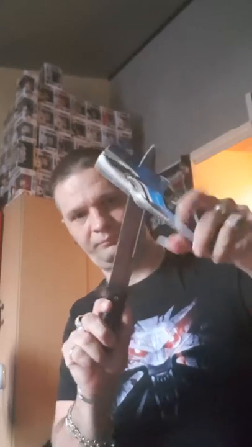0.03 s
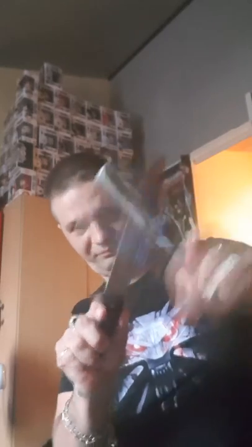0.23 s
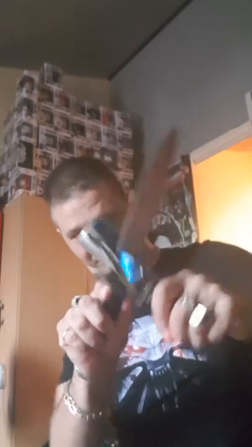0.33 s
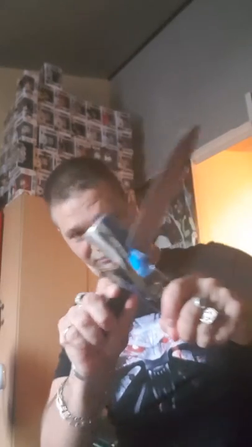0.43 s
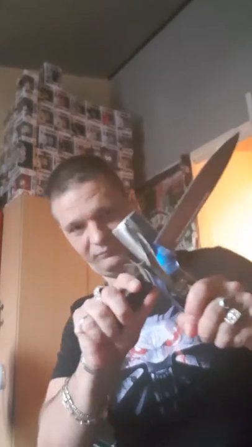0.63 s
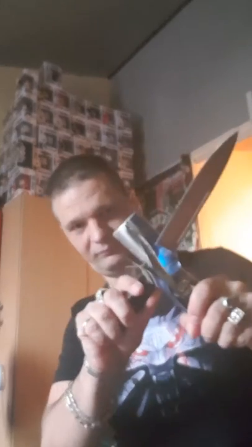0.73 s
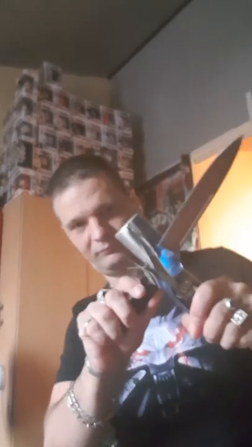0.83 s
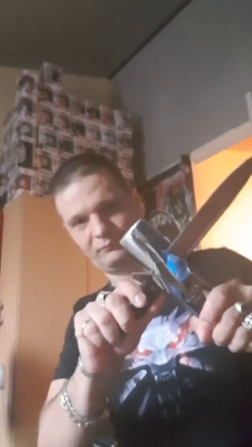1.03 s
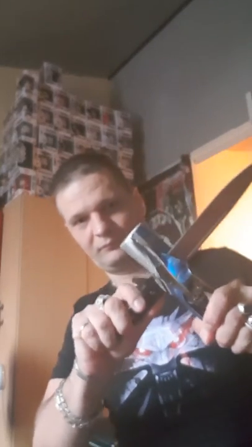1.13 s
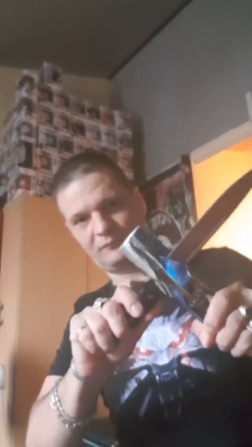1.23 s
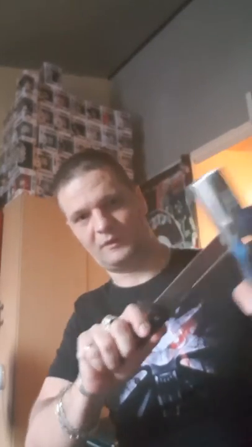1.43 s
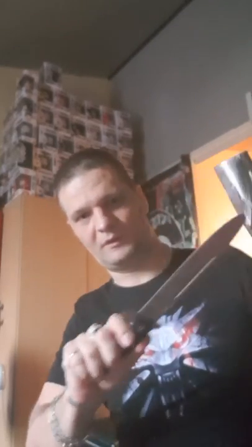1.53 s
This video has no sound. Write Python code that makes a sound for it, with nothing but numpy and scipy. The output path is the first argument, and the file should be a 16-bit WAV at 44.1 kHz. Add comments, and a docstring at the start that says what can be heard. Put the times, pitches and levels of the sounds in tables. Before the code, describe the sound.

A large knife punctures an empty spray can with a loud, short metallic crunch. The can ticks faintly on the blade, then is pulled off with a squeaky scrape and a light slide, close by in a small quiet room.

```python
"""The thin wall of an empty spray can dents, then tears in a loud crackling run as a large knife is
driven through it. The can ticks and rubs on the blade, then is dragged off with a squealing scrape and
a last light slide. Impacts and stick-slip friction excite the wall and the normal modes of can and
blade. The hands add dull thuds that sound the air in the can; the small, quiet room answers briefly."""
import sys
import numpy as np
from scipy import signal
from scipy.fft import rfft, irfft
from scipy.io import wavfile

SR = 44100
rng = np.random.default_rng(int(sys.argv[2]) if len(sys.argv) > 2 else 0)


def bounce(signal):
    """Save signal as a 16-bit WAV file at the path given by the first command-line argument."""
    frames = np.transpose(np.atleast_2d(signal))
    limited = np.clip(frames, -1, 1)
    pcm = np.round(limited * 32767).astype(np.int16)
    wavfile.write(sys.argv[1], SR, pcm)


N = 70560
TIME = np.arange(N) / SR
FFT_SIZE = 2 ** 17
HZ = np.maximum(np.fft.rfftfreq(FFT_SIZE, 1 / SR), 1)

# Sharp contacts of blade and wall; the last four columns are relative to the level:
# (time [s], level [dB], bass [dB], treble [dB], can drive [dB], blade drive [dB])
SNAPS = [(0.0462, -56, -18, -17, 25, -19), (0.0568, -31, -42, 4, -23, -34),
         (.157, -33.5, -14.5, 1.5, 1, -5), (0.1669, -27, 13.5, -22.5, 10, -16),
         (0.1932, -22.5, 4, -17, 6, -23), (0.2206, -19, 0, -13, 15.5, -13.5), (0.2404, -14, 7, 3, -14, 1.5),
         (0.2513, -17, 4, 4, -10, -12), (.2642, -20.5, 2, -5.5, -5.5, -8), (0.273, -19, -10.5, -7, 1, -1.5),
         (0.2817, -10.5, -8, -2.5, 0, -14), (0.2984, -15, -6, -11, 3, -8.5),
         (0.475, -66.5, 0, -11.5, 11.5, 10.5), (1.1085, -36, -18.5, -9.5, -10.5, -30.5),
         (1.1185, -45, -10, -5.5, -10.5, -30), (1.2525, -50, -4.5, -6, 14.5, -12),
         (1.2646, -36.5, -10, 1, 10.5, -20), (1.293, -16.5, -15, -4, -36, -18),
         (1.438, -37, -2.5, -24, -4, -8)]
def snaps():
    """Impulsive excitation: each snap drives the wall, the can's modes and the blade's modes."""
    drive = np.zeros((3, N))
    for start_s, db, bass_db, treble_db, can_db, blade_db in SNAPS:
        force = shelve(contact(start_s), bass_db, treble_db)
        drive += np.outer(from_db([db, db + can_db, db + blade_db]), force)
    return drive

def contact(start_s, spread_s=0.0008, band_hz=132.5):
    """Dispersion: the thin sheet smears a click, as each band arrives with its own small delay."""
    hz = np.fft.rfftfreq(2048, 1 / SR)
    arrivals = rng.gamma(2, size=256)
    group_delay = spread_s * np.interp(hz / band_hz, np.arange(len(arrivals)), arrivals)
    click = irfft(np.exp(-2j * np.pi * np.cumsum(group_delay) * hz[1]))[:len(hz)]
    return np.pad(click * np.sqrt(SR * 0.002), (int(start_s * SR), 0))  # energy of 2 ms at rms 1

# Strokes of the edge along the wall; the last five columns are relative to the level: (time [s],
# duration [s], level [dB], swell [dB], bass [dB], treble [dB], can drive [dB], blade drive [dB])
SCRAPES = [(0, 0.042, -62.5, 3, 12, -8, -8, -12), (0.111, 0.056, -68.5, 13.5, -18, -3, 10.5, -2),
           (0.152, 0.018, -42.5, 9, -9, 2, 11.5, -24), (0.198, 0.018, -34, 6.5, 3, -2, 2, -15),
           (0.222, 0.014, -25, 1.5, -0.5, -1, 10.5, -3.5), (0.245, 0.049, -19, 5, -1.5, 0, -11.5, -28.5),
           (0.424, 0.04, -68.5, 3.5, 7.5, 6.5, -19, -5.5), (0.545, 0.09, -73.5, 1, -1, -16, 13, -2),
           (0.982, 0.05, -61, -8, -2, -14.5, 1.5, -15.5), (1.078, 0.04, -69, 22.5, 1, -5.5, 4, -39.5),
           (1.149, 0.065, -67, 0, 4, -5, 14.5, -33.5), (1.261, 0.081, -28.5, -2.5, -5.5, -4, -13, -17),
           (1.349, 0.081, -46.5, -5.5, 0.5, -7.5, 8, -31), (1.438, 0.08, -45, 3, -6, -1.5, -11, -26)]
def scrapes(slips_per_s=3500, spread_db=3, friction_db=-1.5, attack_share=0.052, release_s=0.005):
    """Stick-slip friction: dense uneven slips over smooth rubbing, chattering as the edge catches."""
    sizes = from_db(spread_db * np.minimum(rng.exponential(1, N), 4)) * rng.choice([-1, 1], N)
    slips = unit_rms(sizes * (rng.random(N) < slips_per_s / SR))
    rubbing = from_db(friction_db) * rng.standard_normal(N)
    chatter = from_db(2 * wander(per_s=270))
    friction = unit_rms((slips + rubbing) * chatter)
    drive = np.zeros((3, N))
    for start_s, length_s, db, swell_db, bass_db, treble_db, can_db, blade_db in SCRAPES:
        age = TIME - start_s
        attack = np.clip(age / (attack_share * length_s), 0, 1)
        release = np.exp(-np.maximum(age - length_s, 0) / release_s)
        growth = from_db(swell_db * np.clip(age / length_s, 0, 1))
        force = shelve(friction * attack * release * growth, bass_db, treble_db)
        drive += np.outer(from_db([db, db + can_db, db + blade_db]), force)
    return drive

# Crackle spectrum of the thin wall: (frequency [Hz], gain [dB])
WALL_RESPONSE = [(40, -25), (150, -15), (270, -20.5), (450, -5.5), (850, -5.5), (1100, 2), (1350, -1),
                 (2000, 1), (2700, 2), (4000, 5), (5900, 7), (7300, 4), (10000, -2), (15500, -11.5)]
def wall_crackle(force):
    """Forced response: the thin wall radiates the contact force over a broad band."""
    return colour(force, at_hz(WALL_RESPONSE, HZ))

# Normal modes of the can and of the blade: (frequency [Hz], peak gain [dB], bandwidth [Hz])
CAN_MODES = [(1055, 14.5, 36), (1150, 4, 170), (1583, -1.5, 72), (1690, -1.5, 81), (2150, -0.5, 38),
             (2530, -9, 200), (3460, -7, 360), (4170, -5, 130), (5450, 1.5, 150)]
BLADE_MODES = [(656, 5.7, 80), (1990, 19.1, 140), (3130, 9.5, 120), (4540, 4.7, 200), (5680, 9, 240)]
def metal_ring(can_force, blade_force):
    """Modal superposition: damped resonances add, each driven more or less as the contact moves."""
    ring = 0
    for force, modes in ((can_force, CAN_MODES), (blade_force, BLADE_MODES)):
        for hz, db, width_hz in modes:
            radius = np.exp(-np.pi * width_hz / SR)
            feedforward = np.array([1, 0, -1]) * (1 - radius ** 2) / 2
            feedback = [1, -2 * radius * np.cos(2 * np.pi * hz / SR), radius ** 2]
            drive = force * from_db(db + 0.5 * wander(per_s=54)) + 1e-18
            ring = ring + signal.lfilter(feedforward, feedback, drive)
    return ring

# Squeals of the wall on the steel: (centre time [s], duration [s], frequency [Hz], level [dB])
SQUEALS = [(.2545, 0.012, 5413, -18), (0.618, 0.034, 1036, -67), (1.105, .03, 1560, -60),
           (1.115, 0.02, 6250, -44.5), (1.194, 0.016, 1550, -58), (1.273, 0.019, 2650, -35),
           (1.283, 0.0067, 2020, -29.5), (1.296, 0.007, 6110, -18.5), (1.298, 0.0089, 2800, -30.5),
           (1.305, 0.0033, 1863, -30), (1.337, 0.017, 3380, -29.5), (1.332, 0.032, 1934, -35.5),
           (1.485, 0.012, 2450, -44), (1.487, 0.017, 5950, -41), (1.505, 0.04, 5100, -53)]
def squeals(sag_share=0.025, waver_share=0.05, flutter_db=4):
    """Stick-slip oscillation: short rasping tones waver, and sag in pitch as the grip lets go."""
    sound = 0
    for centre_s, length_s, hz, db in SQUEALS:
        sag = sag_share * np.clip((TIME - centre_s) / length_s, -1, 1)
        pitch = hz * (1 - sag + waver_share * wander(per_s=1200))
        gain = from_db(db + flutter_db * wander(per_s=360))
        sound = sound + gain * bump(centre_s, length_s) * tone(pitch)
    return sound

# Light knocks of the loose can on the blade:
# (time [s], blade drive [dB], wall and can drive [dB], favoured frequency [Hz])
TAPS = [(0.8538, -48, -61.5, 3700), (0.8836, -49.5, -55, 2290), (.9005, -53.5, -59, 5690),
        (0.9604, -55.5, -63, 2400), (.974, -47.5, -57, 6030), (1.0223, -60.5, -59.5, 2360)]
def taps(favour_db=4, favour_octaves=0.52):
    """Selective excitation: the point where a soft knock lands decides which modes stand out."""
    drive = np.zeros((3, N))
    for start_s, blade_db, wall_db, favoured_hz in TAPS:
        emphasis_db = favour_db * np.exp(-(np.log2(HZ / favoured_hz) / favour_octaves) ** 2)
        knock = shelve(contact(start_s), bass_db=0, treble_db=-7)
        drive += np.outer(from_db([wall_db, wall_db, blade_db]), colour(knock, emphasis_db))
    return drive

# Pushes of the hands: (centre time [s], duration [s], thud level [dB], cavity level [dB])
PUSHES = [(0.035, 0.27, -63.5, -82), (0.257, 0.099, -48, -35.5), (0.429, 0.03, -61, -56.5),
          (1.298, 0.082, -67.5, -59)]
# Spectrum of the dull thud: (frequency [Hz], relative level [dB])
THUD_SPECTRUM = [(20, -5), (40, 3.5), (90, 3), (150, 1.5), (260, -10.5), (600, -48), (3000, -81.5)]
def hand_pushes(cavity_hz=392.5, waver_share=0.047):
    """Cavity resonance: each push makes a dull thud and sounds the air inside the can."""
    thud_gain, cavity_gain = sum(np.outer(from_db([thud_db, cavity_db]), bump(centre_s, length_s))
                                 for centre_s, length_s, thud_db, cavity_db in PUSHES)
    cavity = tone(cavity_hz * (1 + waver_share * wander(per_s=120)))
    return cavity_gain * cavity + thud_gain * stereo_noise(THUD_SPECTRUM, side_db=-16.5)

def room(sound, split_hz=700, tail_db=-5, right_lag_s=0.00004):
    """Convolution: each side has its own near path and tail, alike in the bass; the right one lags."""
    shared_bass = butter(room_tail(), split_hz, "low")
    sides = []
    for lag_s in (0, right_lag_s):
        tail = shared_bass + butter(room_tail(), split_hz, "high")
        path = rfft(near_path(split_hz), FFT_SIZE) + from_db(tail_db) * rfft(tail, FFT_SIZE)
        delay = np.exp(-2j * np.pi * HZ * lag_s)
        sides.append(irfft(rfft(sound, FFT_SIZE) * path * delay)[:N])
    return np.array(sides)

def near_path(split_hz, scatter_db=2.5, decay_s=0.002):
    """Early reflections: direct sound plus a brief scatter off nearby surfaces, even in spectrum."""
    t = TIME[:SR // 10]
    scatter = butter(rng.standard_normal(len(t)) * np.exp(-t / decay_s), split_hz, "high")
    spectrum = 1 + from_db(scatter_db) * rfft(scatter / np.linalg.norm(scatter))
    for _ in range(6):  # flatten the magnitude while keeping the response short
        path = irfft(spectrum / np.abs(spectrum), len(t))[:len(t) // 2]
        spectrum = rfft(path, len(t))
    return path

# Decay of the small room: (frequency [Hz], reverberation time [s])
ROOM_T60 = [(150, 0.4), (400, 0.22), (1000, 0.2), (2500, 0.21), (6000, 0.16), (14000, 0.19)]
def room_tail(gap_s=0.0018, build_s=0.0055):
    """Reverberation: a diffuse field builds up, then decays exponentially, band by band."""
    t = TIME[:SR // 2]
    noise, hz = rfft(rng.standard_normal(len(t))), np.fft.rfftfreq(len(t), 1 / SR)
    centres, t60s = np.transpose(ROOM_T60)
    tail = 0
    for share, t60 in zip(np.eye(len(t60s)), t60s):
        band = irfft(noise * np.interp(hz, centres, share), len(t))
        tail = tail + band * from_db(-60 * t / t60)
    tail *= 1 - np.exp(-np.maximum(t - gap_s, 0) / build_s)
    return tail / np.linalg.norm(tail)

# Background of the still room: (frequency [Hz], relative level [dB])
AIR_SPECTRUM = [(20, -5.5), (60, -1.5), (135, -0.5), (320, -21.5), (750, -28), (2000, -30.5), (16000, -36)]
def still_air(level_db=-77.5):
    """Ambient noise: a faint steady rush, strongest in the bass."""
    return from_db(level_db) * stereo_noise(AIR_SPECTRUM, side_db=-7.0)

def stereo_noise(spectrum, side_db):
    """Partial coherence: coloured noise of rms 1 from a common part and a weaker opposed part."""
    mid, side = rng.standard_normal((2, N))
    return unit_rms(colour(mid + from_db(side_db) * np.array([side, -side]), at_hz(spectrum, HZ)))

def from_db(db):
    """Amplitude ratio of a level in decibels."""
    return 10 ** (np.asarray(db) / 20)

def unit_rms(x):
    """Normalisation to rms 1."""
    return x / np.sqrt(np.mean(x ** 2) + 1e-20)

def at_hz(points, hz):
    """Interpolation of a table on a log-frequency axis."""
    frequencies, values = np.transpose(points)
    return np.interp(np.log(hz), np.log(frequencies), values)

def colour(x, db):
    """Minimum-phase filtering with a gain in dB for each frequency of HZ."""
    cepstrum = irfft(np.log(from_db(db)))
    cepstrum[1:FFT_SIZE // 2] *= 2
    cepstrum[FFT_SIZE // 2 + 1:] = 0
    return irfft(rfft(x, FFT_SIZE) * np.exp(rfft(cepstrum)))[..., :N]

def shelve(x, bass_db, treble_db, bass_hz=540, treble_hz=7800):
    """Shelving: separate gains for the bass and the treble of a force."""
    low = 1 / (1 + (HZ / bass_hz) ** 4)
    high = 1 / (1 + (treble_hz / HZ) ** 7)
    return colour(x, bass_db * low + treble_db * high)

def butter(x, hz, kind):
    """Second-order low- or high-pass filtering."""
    return signal.sosfilt(signal.butter(2, hz, kind, fs=SR, output="sos"), x)

def wander(per_s):
    """Random modulation of rms 1, gliding to a new value per_s times a second."""
    return unit_rms(np.interp(TIME * per_s, np.arange(N), rng.standard_normal(N)))

def bump(centre_s, length_s):
    """Bell-shaped envelope around a moment."""
    return np.exp(-(2 * (TIME - centre_s) / length_s) ** 2)

def tone(hz):
    """Phase integration: a sine of rms 1 follows a pitch curve."""
    return np.sqrt(2) * np.sin(2 * np.pi * np.cumsum(hz) / SR)

def scene():
    """Superposition: can and knife in the room, the pushes of the hands and the still air."""
    wall_force, can_force, blade_force = snaps() + taps() + scrapes()
    metal = wall_crackle(wall_force) + metal_ring(can_force, blade_force) + squeals()
    return room(metal) + hand_pushes() + still_air()

# Responses of the two microphone ports: (frequency [Hz], gain [dB])
LEFT_RESPONSE = [(300, -3), (800, -2), (1050, -5), (1300, -6.5), (1900, 1), (4400, -3), (6500, -4.5),
                 (8500, 0), (15000, 7.5)]
RIGHT_RESPONSE = [(300, -3.5), (800, -2.5), (1100, 2.5), (2400, 5.5), (4400, 4), (6200, 1.5), (8000, 0),
                  (9200, -19.5), (10500, 1.5), (13000, 5)]
def record(dry, ceiling=0.86, cutoff_hz=15900):
    """Transduction: each port colours its side, saturation rounds the peaks, a low-pass cuts the top."""
    ports = (LEFT_RESPONSE, RIGHT_RESPONSE)
    coloured = np.array([colour(side, at_hz(port, HZ)) for side, port in zip(dry, ports)])
    rounded = ceiling * np.tanh(coloured / ceiling)
    return signal.sosfilt(signal.ellip(10, 0.2, 80, cutoff_hz, fs=SR, output="sos"), rounded)

dry = scene()
out = record(dry)
bounce(out)
```